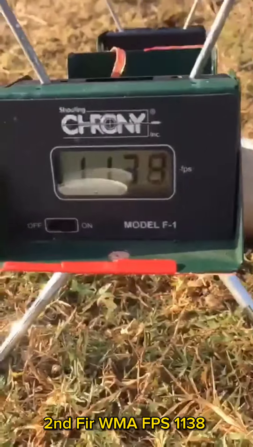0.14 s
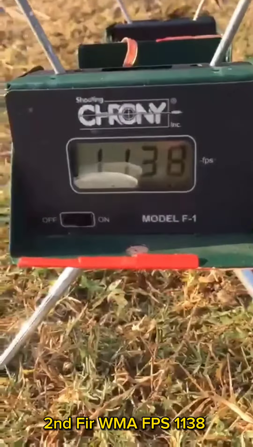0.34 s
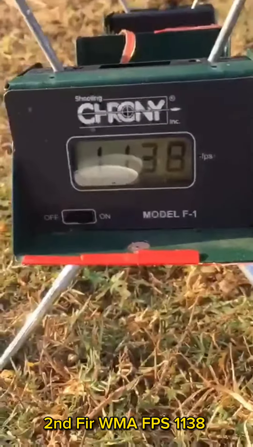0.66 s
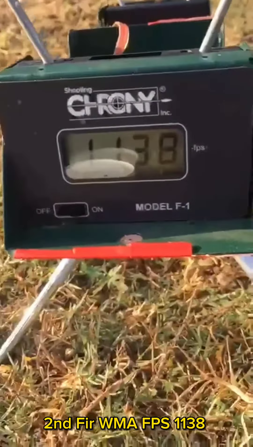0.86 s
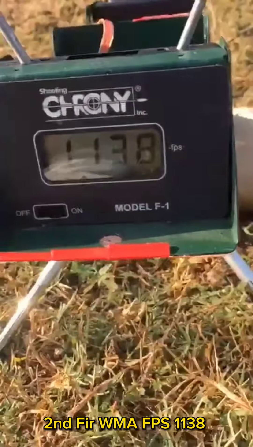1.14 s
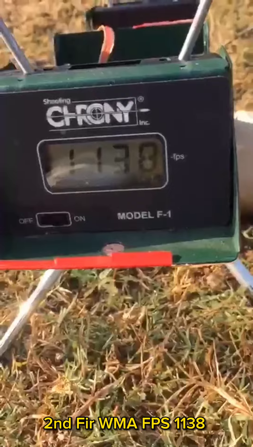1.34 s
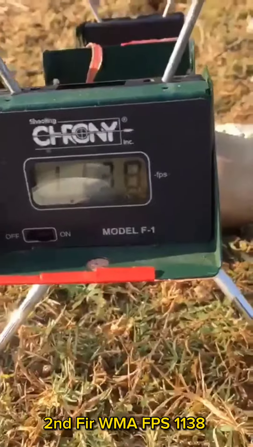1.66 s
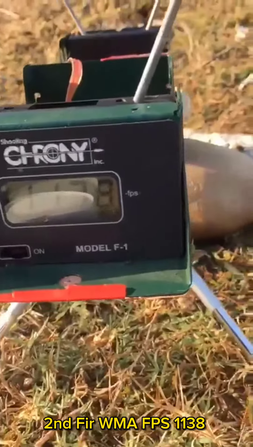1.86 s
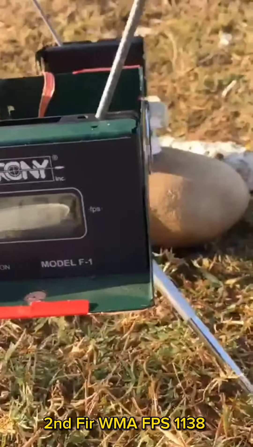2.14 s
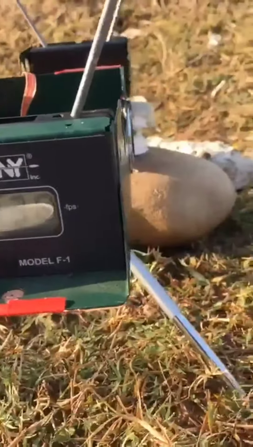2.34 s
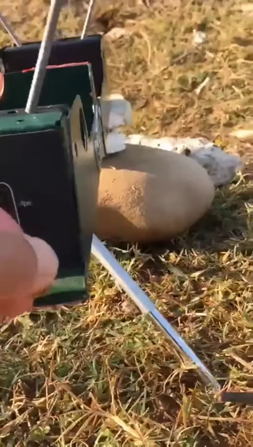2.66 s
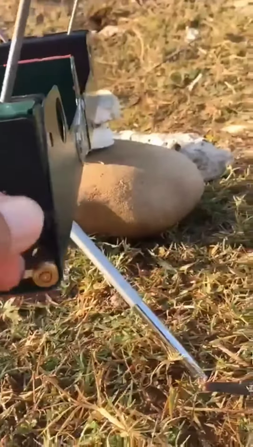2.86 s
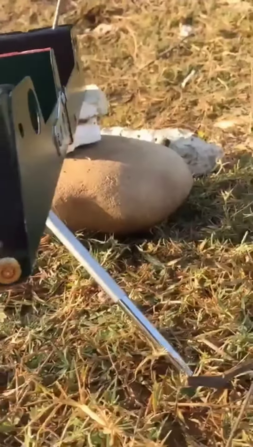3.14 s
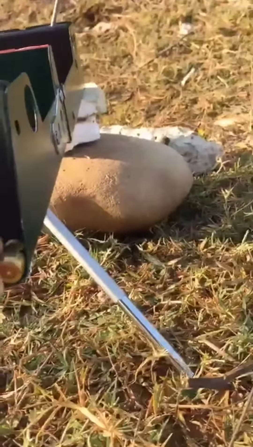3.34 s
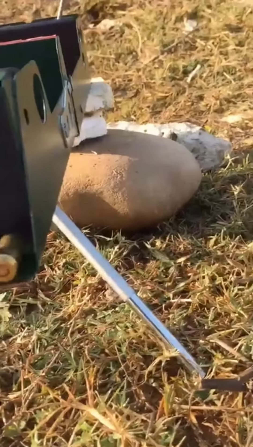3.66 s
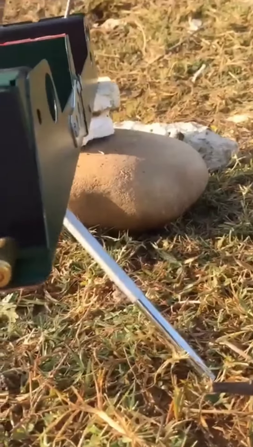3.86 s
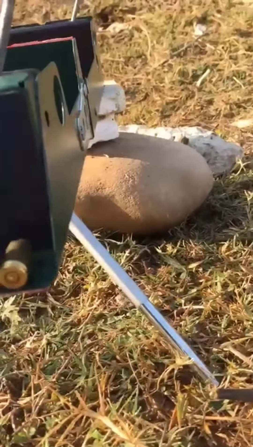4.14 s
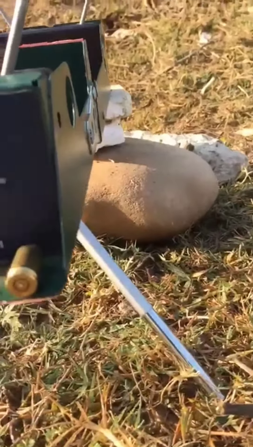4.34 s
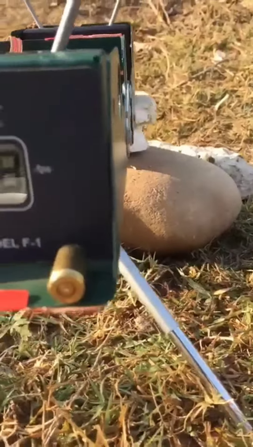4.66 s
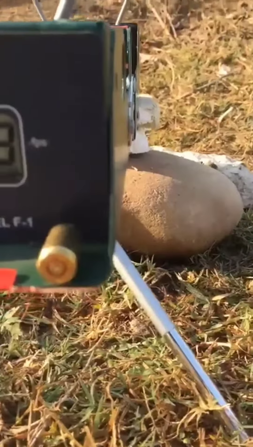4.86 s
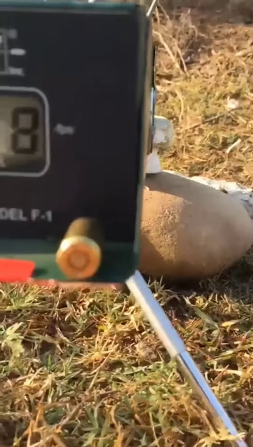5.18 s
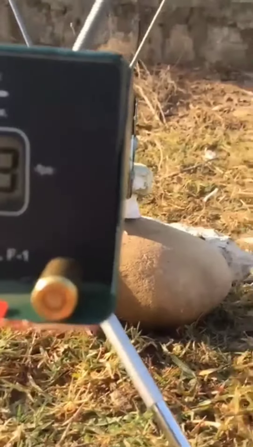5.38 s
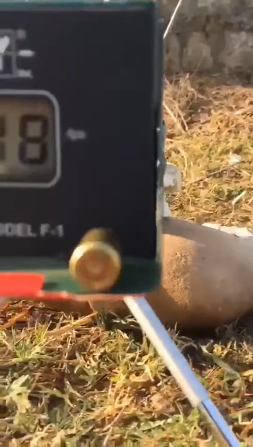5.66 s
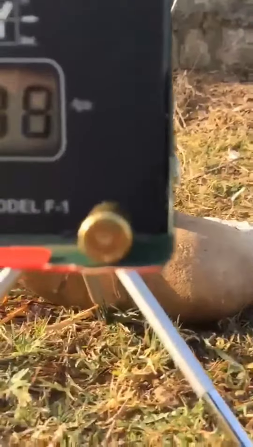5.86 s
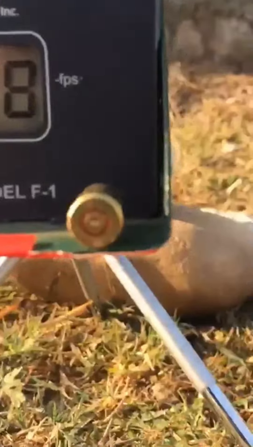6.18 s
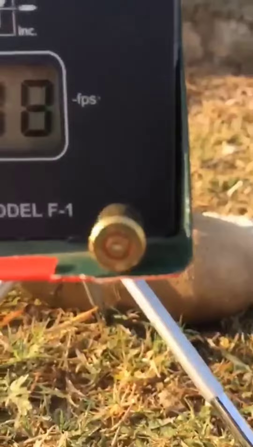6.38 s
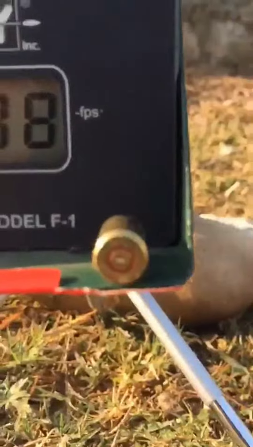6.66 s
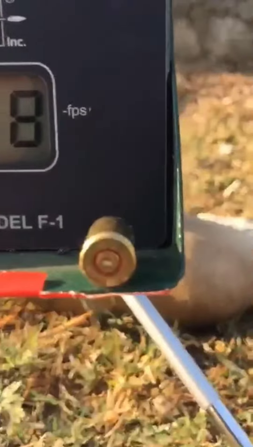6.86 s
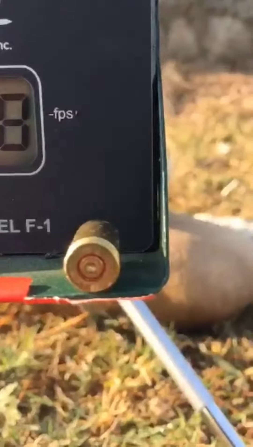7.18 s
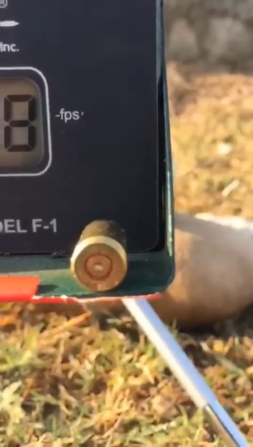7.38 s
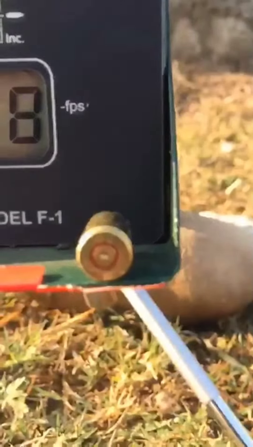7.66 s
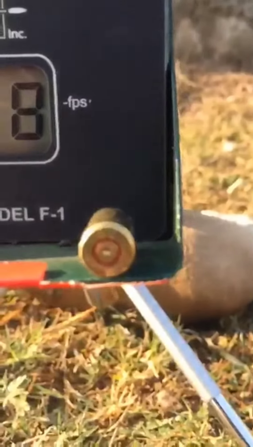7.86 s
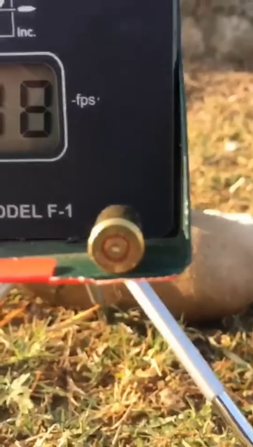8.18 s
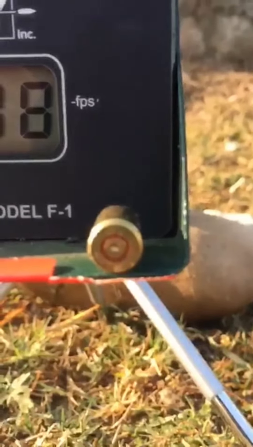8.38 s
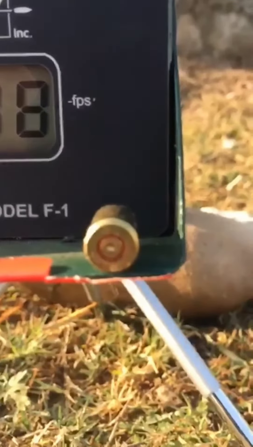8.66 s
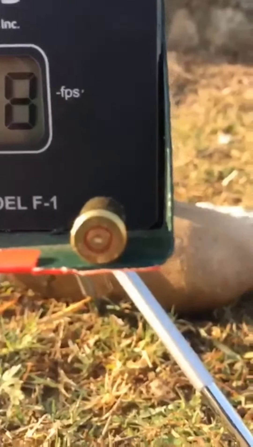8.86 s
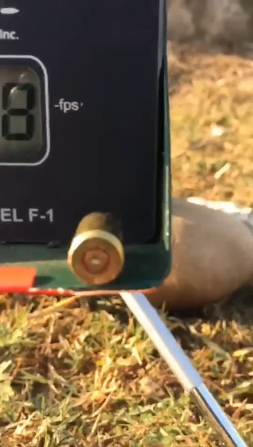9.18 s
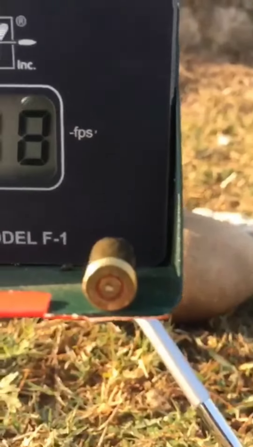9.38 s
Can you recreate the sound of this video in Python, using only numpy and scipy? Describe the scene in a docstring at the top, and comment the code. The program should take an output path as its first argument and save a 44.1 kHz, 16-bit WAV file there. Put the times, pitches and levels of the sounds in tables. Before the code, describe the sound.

Crows caw across an open field for the whole nine and a half seconds, their hoarse, arching cries overlapping with a short outdoor echo. A low, distant rumble lies steadily underneath. A small bird gives a few very faint whistles and chips during the first six seconds. Sharp handling ticks sound at the microphone around 1 second. At about 2.8 seconds, close by, a brass cartridge case is set down on a sheet-metal ledge: a light tap, then a sharp, ringing clink that is the loudest sound, followed by two softer taps near 3.3 seconds. Another handling tick comes at about 4 seconds, with faint scuffs and soft knocks around it. The crows grow busier and are loudest around 7 seconds, then keep calling to the end, with two more quick handling ticks at about 9 seconds.

```python
"""A dry field, from a hand-held camera's microphone. From the start crows caw over one another above a low,
distant rumble: rattling membranes sound through throat and beak, each cry arching in pitch, with a short
outdoor echo. A small bird whistles faintly in the first six seconds; the camera ticks now and then.
Around three seconds in, close by, a brass cartridge case is set down and rings on a sheet-metal ledge.
The crows call on to the end, loudest around seven seconds."""
import sys
import numpy as np
from scipy import signal
from scipy.fft import rfft, irfft
from scipy.io import wavfile
from scipy.ndimage import uniform_filter1d, map_coordinates

SR = 44100
rng = np.random.default_rng(int(sys.argv[2]) if len(sys.argv) > 2 else 0)


def generate_wav(sig):
    """Save sig (samples, or channels by samples) to the path in sys.argv[1] as 16-bit PCM at SR."""
    pcm = np.round(np.clip(np.atleast_2d(sig).T, -1, 1) * 32767).astype(np.int16)
    wavfile.write(sys.argv[1], SR, pcm)


N = 420273

# Distant rumble and still air. Each row: frequency in Hz, relative spectral density in dB.
AIR_SPECTRUM = [(22, -39), (32, -24), (48, -1.5), (72, 0.2), (105, -1.7), (160, -6), (240, -15),
                (350, -23.5), (550, -32.5), (1000, -36.5), (2000, -39), (3200, -48), (7000, -55),
                (12000, -62.5)]
# The small bird's rising whistles. Each row: start in seconds, level in dB.
BIRD_WHISTLES = [(.025, -62), (1.335, -70.5), (4.1, -60.5), (4.88, -63), (5.735, -68)]
# Its short, high, falling chips. Each row: start in seconds, level in dB.
BIRD_CHIPS = [(2.335, -66), (5.864, -59.5)]
# Sharp handling ticks, right at the microphone. Each row: start in seconds, level in dB, centre in Hz.
CAMERA_TICKS = [(0.962, -19.5, 1460), (0.9666, -23, 1360), (1.293, -28, 8800), (3.961, -32, 2290),
                (5.135, -49, 1390), (9.003, -29, 2240), (9.045, -28, 1080)]
# Soft knocks on the camera body. Each row: start in seconds, level in dB.
CAMERA_KNOCKS = [(.66, -52), (1.24, -50), (1.954, -51), (2.585, -47), (4.075, -48.5), (4.807, -45.5),
                 (5.842, -45), (6.389, -47), (9.004, -39), (9.045, -41.5)]
# Scuffs of the hand. Each row: start in seconds, length in seconds, level in dB.
HAND_SCUFFS = [(3.999, 0.051, -49.5), (5.133, 0.044, -56), (5.17, 0.15, -59), (5.371, 0.038, -57)]
# The case meets the ledge. Each row: start in seconds, level in dB, hardness in dB per octave, ring in dB.
CASE_TAPS = [(2.836, -13.5, 2, -16), (2.926, -1, 5, -7), (3.303, -17, 3, -11), (3.3382, -11.5, 4, -15)]
# Modes of case and ledge. Each row: frequency in Hz, level in dB, time to fall 60 dB in seconds.
METAL_MODES = [(724, -33.5, 0.43), (1380, -6, 0.1), (1430, -15, 0.14), (2210, -30.5, 0.22),
               (2210, -9.5, 0.079), (3036, -25.5, 0.097), (2770, -37.5, 0.49), (3040, -60, 0.31),
               (3180, -37, 0.23), (3500, -40.5, 0.35), (3623, -43, 0.19), (3930, -20, 0.024),
               (3870, -47.5, 0.22), (4280, -31, 0.045), (5500, -15.5, 0.015), (6640, -30, 0.049),
               (8370, -37, 0.14), (10800, -39.5, 0.036), (11560, -44, 0.1)]
# The crack of brass on sheet metal. Each row: frequency in Hz, relative level in dB.
CRACK_SPECTRUM = [(300, -52), (650, 6), (1000, -16), (1400, 5), (2200, 5.5), (2900, 4), (3300, -11.5),
                  (3900, -2), (4700, -12.5), (5700, -12.5), (7300, -26), (8600, -28), (10300, -29.5),
                  (11600, -27)]
# A crow's throat and beak. Each row: frequency in Hz, gain in dB.
THROAT_RESPONSE = [(500, -56.5), (760, -14.5), (950, -10.5), (1200, -10.5), (1500, -7), (1900, -5),
                   (2280, -9.5), (2550, -19.5), (2900, -28.5), (3400, -24), (4950, -33.5), (5800, -28.5),
                   (7400, -41), (8600, -40.5), (11000, -61.5)]
# The cries above the field. Each row: start and length in seconds, top pitch in Hz, sag as a share of the
# pitch, crest as a share of the length, attack in seconds, roughness from 0 to 1, level in dB, open-beak
# gain in dB, brightness in dB, then the mouth, nasal and upper resonances in Hz.
CROW_CAWS = [(0.105, 0.39, 444, .1, 0.29, 0.051, 0.39, -52.5, 13, -9, 1870, 3930, 5840),
             (0.31, 0.27, 453, 0.13, 0.25, 0.073, 0.43, -40.5, 7, -11.5, 1796, 3930, 5670),
             (0.535, 0.35, 480, 0.25, 0.21, 0.035, 0.39, -51, 16, -13, 1820, 3740, 5370),
             (0.751, 0.3, 463.7, 0.34, 0.46, 0.15, 0.46, -36.5, 13.5, -1.5, 1850, 3780, 5200),
             (0.864, 0.31, 504.4, 0.18, 0.4, 0.11, 0.54, -37.5, 1, -5.5, 1660, 4200, 6200),
             (1.38, 0.13, 450, 0.084, 0.7, 0.057, 0.37, -54.5, 22, -1, 1860, 3580, 5100),
             (1.46, .27, 513.3, 0.28, 0.49, 0.094, 0.56, -36, 9, -1, 1926, 4240, 6170),
             (1.601, 0.23, 441, 0.15, 0.2, 0.055, 0.51, -46.5, -29, -17, 1770, 4300, 5680),
             (2.036, 0.32, 468.5, 0.18, 0.41, 0.14, 0.68, -39, 2, -2.5, 2160, 3940, 5160),
             (2.094, 0.28, 509.6, 0.27, 0.38, 0.086, 0.53, -32.5, 9, -6, 1780, 4270, 6220),
             (2.508, 0.15, 482, 0.14, 0.53, 0.073, 0.34, -54.5, 15, 5, 1950, 4170, 4950),
             (2.58, .3, 462.7, 0.24, 0.34, 0.1, 0.49, -38, 7.5, -5.5, 2010, 3830, 4650),
             (3.091, 0.32, 499, 0.19, 0.33, 0.09, 0.38, -37, 6, -0.5, 1770, 4160, 5620),
             (3.266, 0.3, 442.3, 0.17, 0.35, 0.11, 0.43, -41, 12, -2, 1870, 4350, 5330),
             (3.481, 0.29, 476, 0.15, 0.39, 0.053, 0.43, -53, 8.5, -13, 1920, 3950, 5420),
             (3.795, 0.25, 451, 0.21, 0.25, 0.095, 0.56, -38.5, 17, -0.5, 1774, 4400, 5430),
             (3.977, 0.34, 468.4, 0.17, 0.34, 0.049, 0.2, -55, 9, -17, 1920, 4550, 5040),
             (4.196, 0.21, 474, 0.18, 0.43, 0.077, 0.22, -50.5, 24, -.5, 1920, 3700, 6180),
             (4.301, 0.32, 448, 0.13, 0.24, .09, 0.64, -41, 10, -5.5, 1660, 4060, 5600),
             (4.83, .31, 463.5, .26, 0.29, 0.1, 0.54, -41.5, 3.5, -10.5, 1726, 3800, 5370),
             (5.356, 0.31, 458, 0.19, 0.38, 0.1, 0.42, -43.5, 3.5, -3.5, 1796, 4060, 5900),
             (5.922, 0.27, 463.3, .16, 0.32, 0.068, 0.33, -45, 8.5, -1, 1960, 3920, 5940),
             (6.215, 0.29, 507, 0.21, 0.38, 0.09, 0.4, -34.5, 0.5, 1, 1890, 4200, 6950),
             (6.374, 0.32, 473.4, 0.16, 0.31, 0.084, 0.47, -45, 8.5, -4.5, 2050, 3830, 5820),
             (6.656, 0.31, 480.6, 0.11, 0.41, 0.11, 0.48, -41.5, 13.5, 5.5, 1960, 3800, 5100),
             (6.781, 0.29, 502, .2, 0.43, 0.13, 0.42, -30.5, 7, -1, 1904, 3920, 5800),
             (7.045, 0.18, 451, 0.14, .5, 0.083, 0.47, -31.5, 3, -1, 1760, 4070, 5550),
             (7.145, 0.21, 433.3, 0.21, 0.54, 0.097, 0.49, -33, 4.5, -9, 1720, 4100, 5660),
             (7.315, 0.28, 504.8, .23, 0.35, 0.09, 0.26, -32.5, 6.5, 0, 1860, 3860, 5900),
             (7.421, 0.33, 459.7, 0.33, 0.31, 0.1, 0.45, -36, -4, -4, 1800, 3820, 5500),
             (7.598, 0.27, 449, 0.16, 0.31, 0.088, 0.39, -34, 7.5, -10, 1690, 4040, 5500),
             (7.917, 0.28, 491, 0.34, .35, 0.06, 0.64, -55, 6, -7, 2230, 3750, 6800),
             (7.985, 0.3, 514.4, 0.29, 0.44, 0.1, 0.42, -31.5, 8, -1.5, 1800, 3690, 5990),
             (8.159, 0.2, 452, 0.19, 0.6, 0.13, .5, -42, 12.5, -2.5, 2000, 4230, 5500),
             (8.452, .23, 464.3, .15, 0.32, 0.089, 0.17, -39, -16.5, -5.5, 1893, 3940, 5070),
             (8.541, 0.27, 464, 0.14, 0.27, 0.044, .38, -42, 10.5, -12, 1840, 3960, 5900),
             (8.805, 0.3, 517, 0.22, 0.31, 0.078, 0.35, -36, -3, -2.5, 1897, 4010, 6500),
             (8.958, 0.24, 463, 0.17, 0.27, 0.049, 0.27, -39, -4, -9, 1850, 4140, 5130),
             (9.089, 0.31, 464, .15, 0.18, 0.039, 0.4, -44.5, 10, -3, 2000, 4170, 5230),
             (9.189, 0.29, 452.4, .2, .25, 0.047, 0.44, -42, 4, -20, 1670, 3870, 5100)]


def undb(db):
    """Decibels to gain."""
    return 10 ** (np.asarray(db) / 20)


def unit(x):
    """Scale to rms 1."""
    return x / np.sqrt(np.mean(x ** 2))


def add(out, start, x):
    """Mix x into out from a start in seconds."""
    i = max(int(start * SR), 0)
    out[i:i + len(x)] += x[:max(len(out) - i, 0)]


def seconds(length):
    """Time axis of a short sound."""
    return np.arange(int(length * SR)) / SR


def fade(t, t60):
    """Exponential decay, 60 dB down at t60."""
    return np.exp(-np.log(1000) * t / t60)


def noise(t):
    """White noise for a sound shorter than a second."""
    return rng.standard_normal(SR)[:len(t)]


def wander(t, per_s):
    """Random drift through per_s new values a second."""
    knots = rng.standard_normal(size=2048)
    return np.interp(t * per_s, np.arange(len(knots)), knots)


def curve(points, hz):
    """Level in dB of a spectrum at given frequencies."""
    point_hz, db = np.transpose(points)
    return np.interp(np.log(hz), np.log(point_hz), db)


def bump(hz, centre_hz, width_hz):
    """Bell-shaped rise from 0 to 1 around a resonance."""
    return np.exp(-((hz - centre_hz) / width_hz) ** 2)


def colour(x, db_at, size=4096):
    """Minimum-phase filter whose gain in dB is db_at(hz)."""
    hz = np.maximum(np.fft.rfftfreq(size, 1 / SR), 1)
    cepstrum = irfft(np.log(undb(db_at(hz))))
    cepstrum[1:size // 2] *= 2
    cepstrum[size // 2 + 1:] = 0
    impulse = irfft(np.exp(rfft(cepstrum)))
    return signal.fftconvolve(x, impulse)[:len(x)]


def damped(x, centre_hz, width_hz):
    """Pass x through one damped, steep-sided resonance, keeping its level."""
    def db_at(hz):
        detuning = (hz ** 2 - centre_hz ** 2) / (hz * width_hz)
        return -20 * np.log10(1 + detuning ** 2).clip(0, 4)
    return unit(colour(x, db_at)) * np.std(x)


def reflections(x, t60, wet_db, treble_db):
    """The dense, fading cloud of echoes that x sets off."""
    t = seconds(t60)
    cloud = noise(t) * fade(t, t60)
    tail = colour(cloud / np.linalg.norm(cloud), lambda hz: curve([(2000, 0.013), (5000, treble_db)], hz))
    return undb(wet_db) * signal.fftconvolve(x, tail)[:len(x)]


def across_field(x):
    """The direct sound, plus a short, faint, dull echo from walls and trees."""
    return x + reflections(x, t60=0.17, wet_db=-10, treble_db=-10)


def air(bed_db=-41.5, waver_db=1.1, breeze_db=-61.5, buffet_swing_db=6):
    """A wavering bed of far-off rumble and faint hiss, with light buffets of breeze."""
    t = np.arange(N) / SR
    bed = unit(colour(rng.standard_normal(N), lambda hz: curve(AIR_SPECTRUM, hz), size=16384))
    breeze = damped(rng.standard_normal(N), centre_hz=300, width_hz=260)
    buffets = unit(breeze * undb(buffet_swing_db * wander(t, 16)))
    return bed * undb(bed_db + waver_db * wander(t, 7.3)) + undb(breeze_db) * buffets


def slur(length, from_hz, to_hz, turn_share=0.79, flutter_db=7, waver=0.035):
    """A thin, fluttering note that glides to its far pitch and turns back a little."""
    t = seconds(length)
    glide = np.sin(np.pi / 2 * t / (turn_share * length)) ** 2
    hz = from_hz * (to_hz / from_hz) ** glide * (1 + waver * wander(t, 300))
    strength = undb(flutter_db * wander(t, 78)) * np.sin(np.pi * t / length)
    return strength * np.sin(2 * np.pi * np.cumsum(hz) / SR)


def songbird():
    """A small bird's whistles and chips, faint across the field."""
    out = np.zeros(N)
    for start, db in BIRD_WHISTLES:
        add(out, start, undb(db) * slur(0.095, from_hz=3650, to_hz=4960))
    for start, db in BIRD_CHIPS:
        add(out, start, undb(db) * slur(0.047, from_hz=6900, to_hz=5780))
    return across_field(out)


def camera_handling(snap_db=-19, catch_db=9, grain_db=6):
    """The hand at the microphone: ticks, soft knocks, and scuffs that catch and then slide grainily."""
    out, t = np.zeros(N), seconds(0.29)
    for start, db, centre_hz in CAMERA_TICKS:
        touch = noise(t) * fade(t, t60=0.01)
        body = damped(touch, centre_hz, width_hz=0.85 * centre_hz)
        add(out, start, undb(db) * (body + undb(snap_db) * touch))
    for start, db in CAMERA_KNOCKS:
        touch = noise(t) * fade(t, t60=0.075)
        add(out, start, undb(db) * damped(touch, centre_hz=625, width_hz=214))
    for start, length, db in HAND_SCUFFS:
        t = seconds(length)
        grip = unit(undb(grain_db * wander(t, 78))) + undb(catch_db) * fade(t, t60=0.02)
        add(out, start, undb(db) * damped(noise(t) * grip, centre_hz=1540, width_hz=1140))
    return out


def cartridge_case(crack_db=-9, tail_db=-45, rebound_s=0.0014, rebound_db=-10):
    """Brass on sheet metal, close by: a crack and two ever weaker rebounds, then the modes ring out."""
    out, t = np.zeros(N), seconds(0.76)
    ring = sum(undb(db) * np.sin(2 * np.pi * hz * t) * fade(t, t60) for hz, db, t60 in METAL_MODES)
    crack_decay = undb(crack_db) * fade(t, t60=0.038) + undb(tail_db) * fade(t, t60=0.45)
    for start, db, db_per_octave, ring_db in CASE_TAPS:
        blow = undb(ring_db) * ring
        for bounce in range(3):
            crack = unit(colour(noise(t), lambda hz: curve(CRACK_SPECTRUM, hz)))
            add(blow, bounce * rebound_s, undb(bounce * rebound_db) * crack * crack_decay)
        add(out, start, undb(db) * colour(blow, lambda hz: db_per_octave * np.log2(hz / 2500)))
    return out


def syrinx(t, pitch_hz, rough, rattle_hz=76, bite_db=3, fray_radians=1.7, ragged_db=3.5, rasp=0.2):
    """A crow's membrane pulses, their rate and strength shaken by a slower, uneven rattle."""
    beat_hz = rattle_hz * (1 + 0.0302 * wander(t, 3.85) + 0.407 * rough * wander(t, 69.4))
    rattle = 2 * np.pi * np.cumsum(beat_hz) / SR
    swing = (0.038 + 0.063 * rough) * np.cos(rattle + 0.73)
    jitter = 0.042 * rough * (wander(t, 450) + 0.5 * wander(t, 60.7))
    phase = 2 * np.pi * np.cumsum(pitch_hz * (1 + swing + jitter)) / SR
    harmonics = np.arange(1, 24)[:, None]
    height = harmonics / 9
    # Each beat snaps the membranes harder, so the treble pulses, fully from the ninth harmonic up.
    bite = undb(bite_db * np.cos(rattle) * np.minimum(height, 1) ** 2)
    fray = fray_radians * np.clip(height - 0.5, 0, 1) * np.array([wander(t, 130) for _ in harmonics])
    pulses = unit((bite * np.cos(harmonics * phase + fray)).sum(axis=0))
    hiss = noise(t) * (1 + np.cos(phase)) * bite[-1]  # air escapes once a cycle
    strength = (1 + 0.11 * np.cos(rattle)) * undb(ragged_db * rough * wander(t, 129.4))
    return strength * (pulses + rasp * rough * hiss)


def tract_db(hz, beak_hz, beak_db, bright_db, mouth_hz, nasal_hz, upper_hz):
    """Gain of the throat: four resonances, and treble notches cut by an echo along the windpipe."""
    low = beak_db * bump(hz, beak_hz, 190) + 10 * bump(hz, mouth_hz, 150)
    high = 9 * bump(hz, nasal_hz, 360) + 6 * bump(hz, upper_hz, 500)
    notch_spacing_hz = max((upper_hz - nasal_hz) / 2, 766)
    round_trip = 2 * np.pi * (hz - nasal_hz) / notch_spacing_hz
    echo = np.interp(hz, [2450, 2850], [0, 0.72])
    windpipe = 10 * np.log10(1 + 2 * echo * np.cos(round_trip) / (1 + echo ** 2))
    shelf = np.interp(hz, [2100, 3400], [0, bright_db])
    return curve(THROAT_RESPONSE, hz) + low + high + windpipe + shelf


def gape(source, t, crest, top_hz, open_db, bright_db, mouth_hz, nasal_hz, upper_hz, poses=7):
    """The beak opens onto the third harmonic and narrows after the crest; the nasal resonance rises."""
    out = 0
    for share in np.linspace(0, 1, poses):
        closed = np.exp(-(share * t[-1] / 0.051) ** 2)
        narrow = np.clip((share - crest) / 0.35, 0, 1)
        blend = np.array([closed, 1 - closed - narrow, narrow])  # nearly closed, wide open, narrowed
        beak_hz = blend @ [1130, 3 * top_hz, 1407]
        beak_db = blend @ [15, open_db, open_db - 6]
        treble_db = bright_db - 0.5 * (2 * share - 1) ** 2  # slightly duller at both ends
        rising_hz = nasal_hz * (1 + 0.12 * (share - 0.5))
        pose = beak_hz, beak_db, treble_db, mouth_hz, rising_hz, upper_hz
        voice = colour(source, lambda hz: tract_db(hz, *pose), size=1024)
        crossfade = np.maximum(1 - abs(t / t[-1] - share) * (poses - 1), 0)
        out = out + unit(voice) * crossfade
    return out


def near_reflections(x, t, paths=3):
    """Reflections near the crow cut notches in the treble; they shift as its head bobs."""
    out = x.copy()
    for _ in range(paths):
        out += reflections(x, t60=0.011, wet_db=-14, treble_db=17) * wander(t, 11) / np.sqrt(paths)
    return out


def caw(length, top_hz, sag, crest, attack_s, rough, db, *throat,
        scoop=0.25, release_s=0.061, shut_db=-25.5, breath_db_per_s=-26):
    """One cry: the pitch scoops up to a crest and sags ever faster while the breath fades."""
    t = seconds(length)
    share = t / length
    before_crest = np.maximum(1 - share / crest, 0)
    after_crest = np.maximum((share - crest) / (1 - crest), 0)
    arch = 1 - scoop * before_crest ** 2 - sag * after_crest ** 1.5
    # The resonances follow a quarter of the pitch arch and drift a little.
    tightness = (arch / np.median(arch)) ** 0.25 * (1 + 0.012 * wander(t, 12))
    pitch_hz = top_hz * arch * (1 + 0.009 * wander(t, 28))
    source = syrinx(t, pitch_hz / tightness, rough)  # the speed change below restores the pitch
    voice = near_reflections(gape(source, t, crest, top_hz, *throat), t)
    voice = map_coordinates(voice, [np.cumsum(tightness)], mode="mirror")  # a tighter throat rings faster
    voice /= np.sqrt(uniform_filter1d(voice ** 2, 1900))  # even breath pressure; the fast rattle stays
    opening = np.maximum(1 - t / attack_s, 0) ** 1.89
    closing = np.maximum(1 - (length - t) / release_s, 0) ** 3.06
    return voice * undb(db + shut_db * (opening + closing) + breath_db_per_s * (t - length / 2))


def crows():
    """The overlapping caws, reaching the microphone across the field."""
    out = np.zeros(N)
    for start, *cry in CROW_CAWS:
        add(out, start, caw(*cry))
    return across_field(out)


def scene():
    """Everything near and far, at one microphone."""
    return (crows() + cartridge_case() + camera_handling() + songbird() + air())[None]


def record(dry):
    """The camera cuts off steeply above 12 kHz."""
    return signal.sosfilt(signal.ellip(8, 0.2, 70, 12000, fs=SR, output="sos"), dry)


dry = scene()
out = record(dry)
generate_wav(out)
```